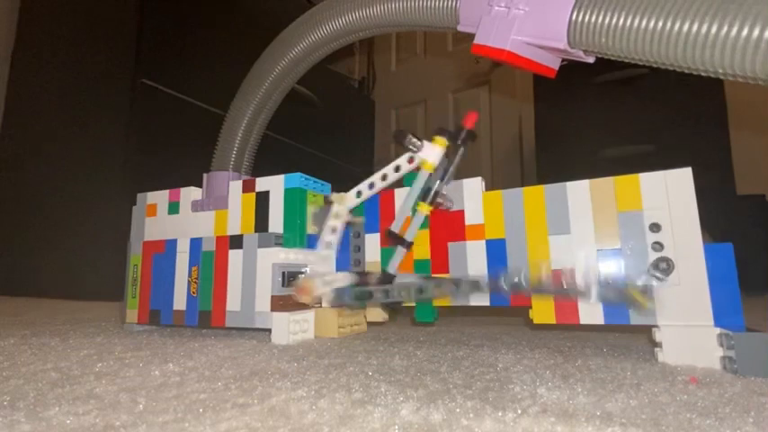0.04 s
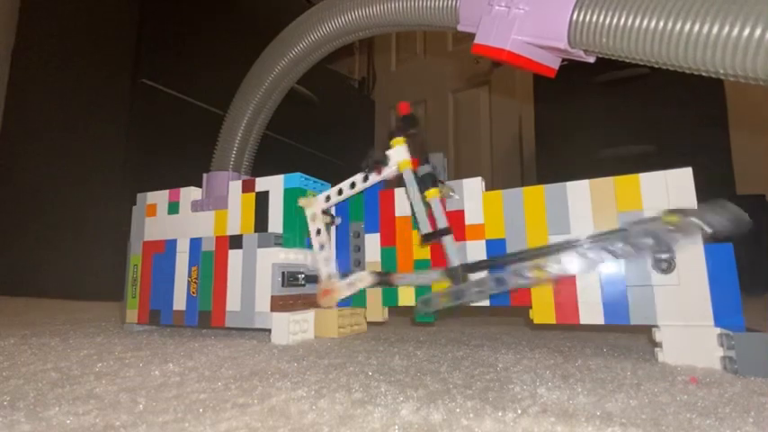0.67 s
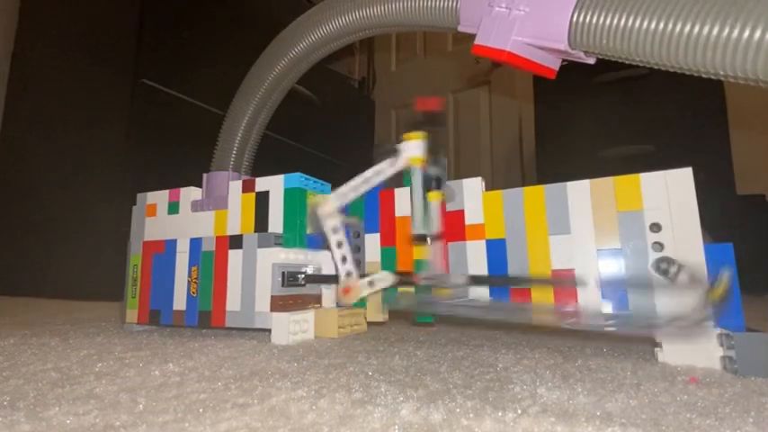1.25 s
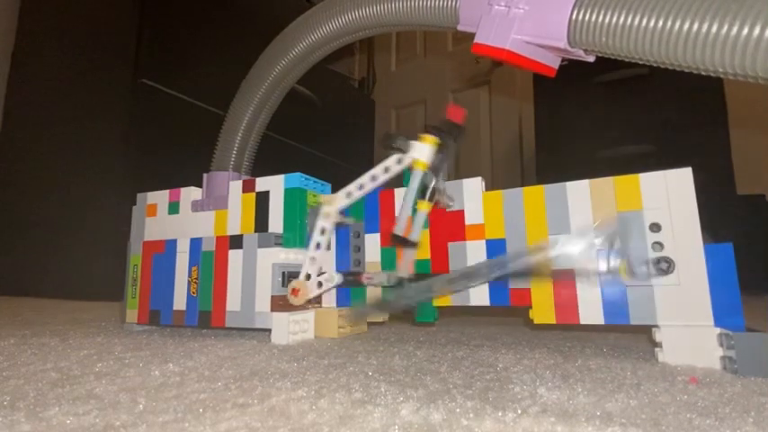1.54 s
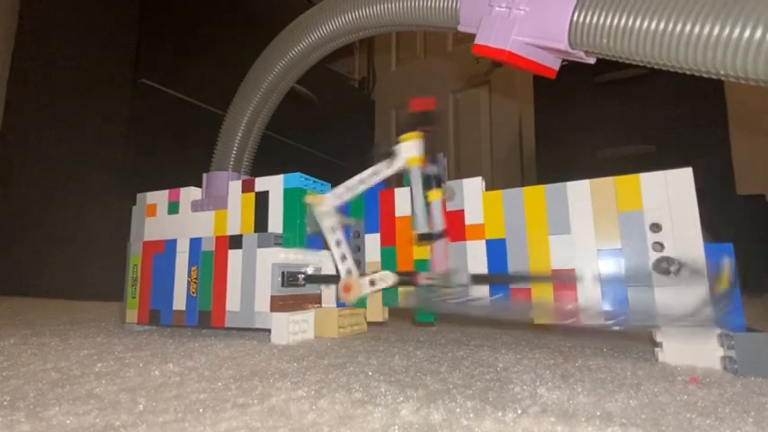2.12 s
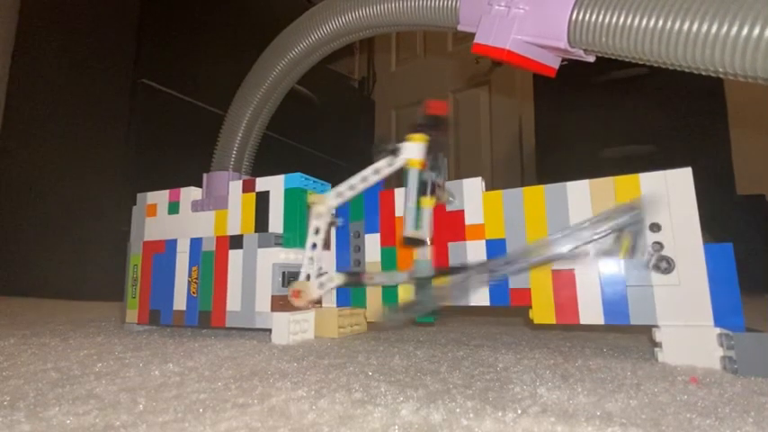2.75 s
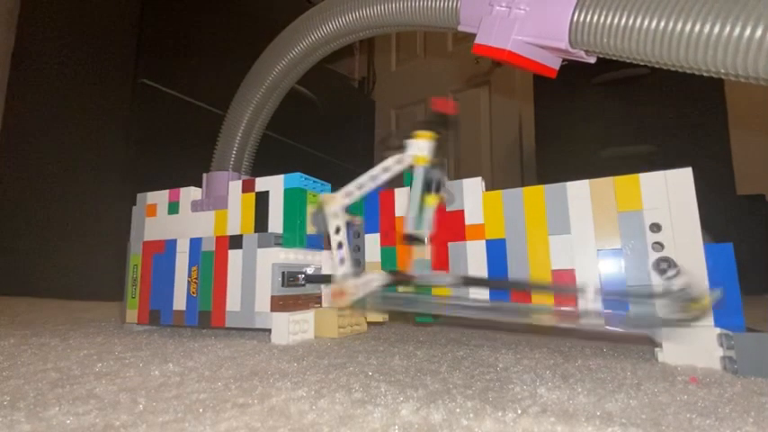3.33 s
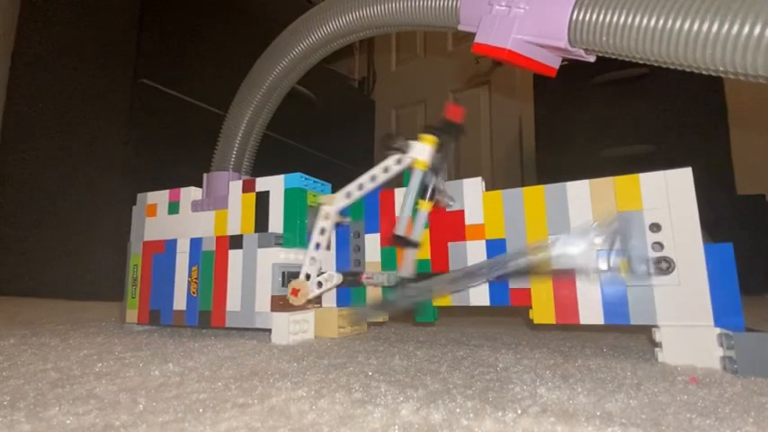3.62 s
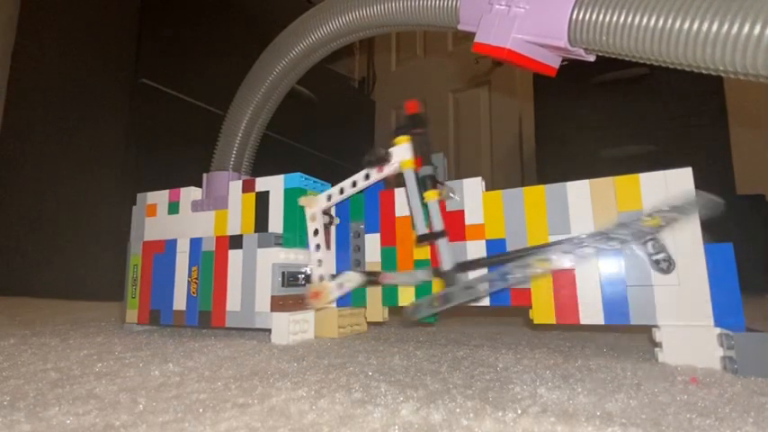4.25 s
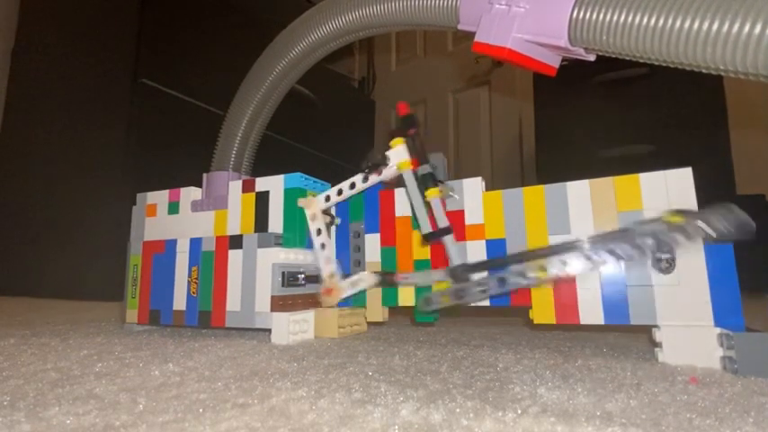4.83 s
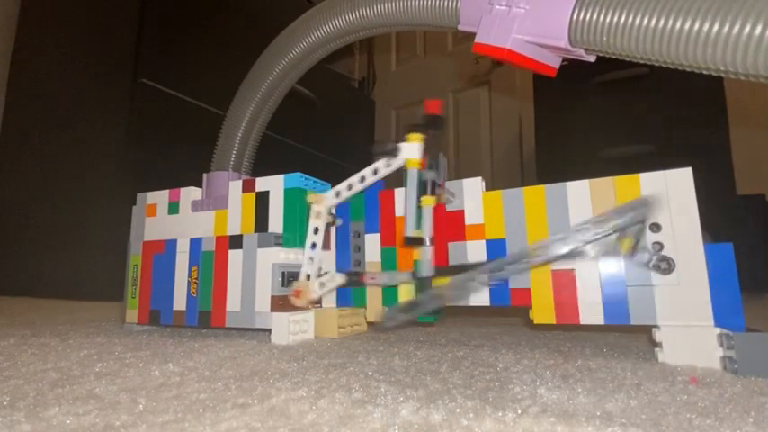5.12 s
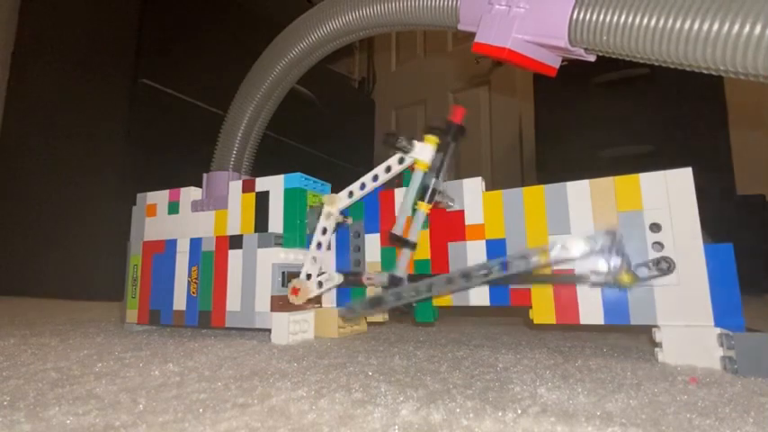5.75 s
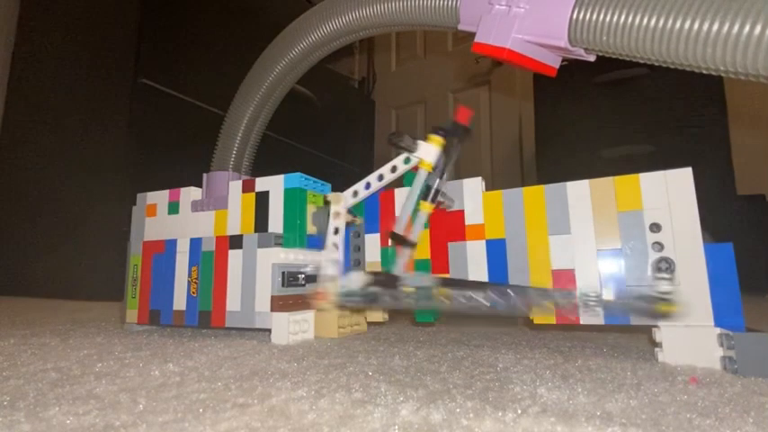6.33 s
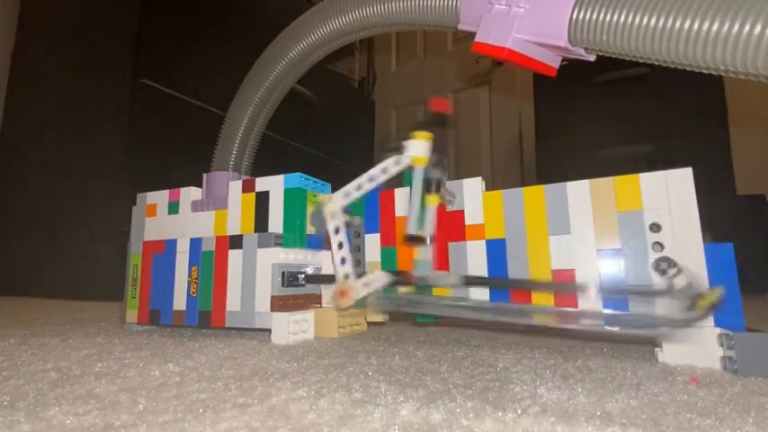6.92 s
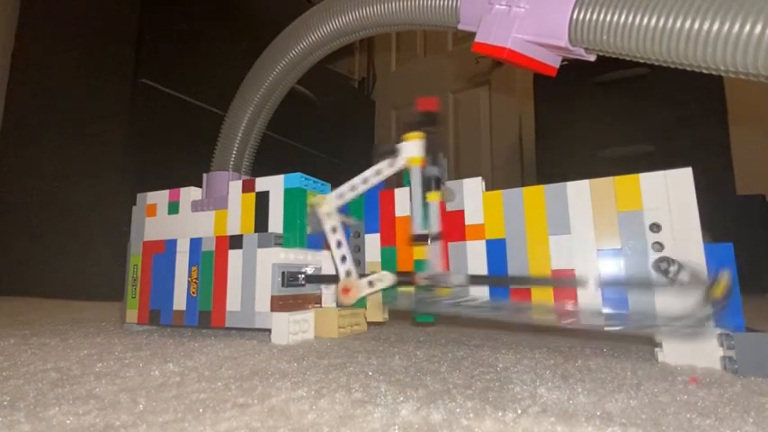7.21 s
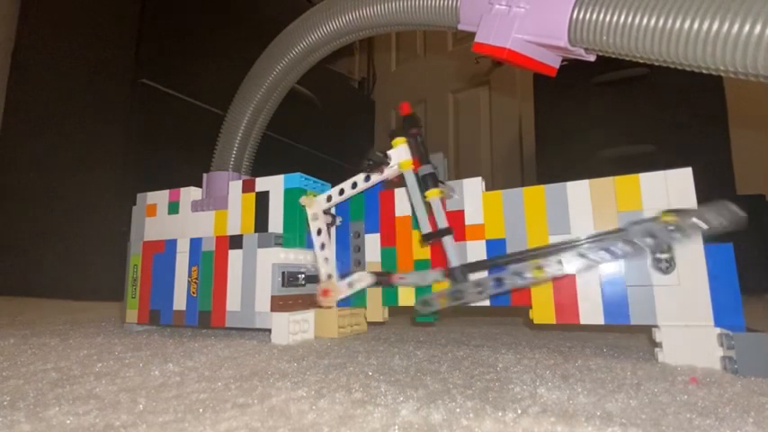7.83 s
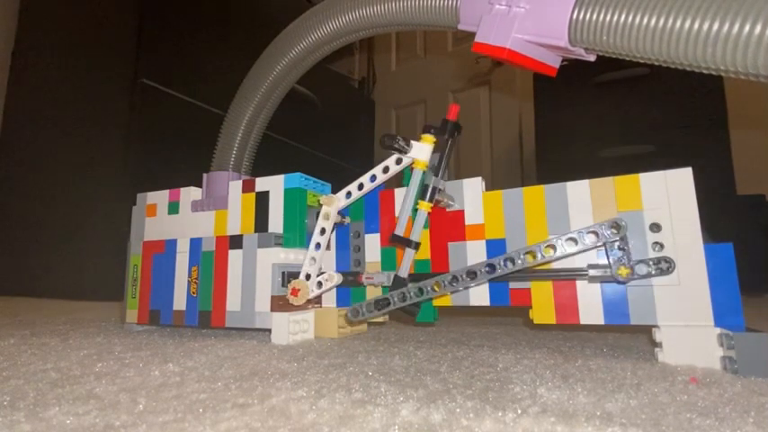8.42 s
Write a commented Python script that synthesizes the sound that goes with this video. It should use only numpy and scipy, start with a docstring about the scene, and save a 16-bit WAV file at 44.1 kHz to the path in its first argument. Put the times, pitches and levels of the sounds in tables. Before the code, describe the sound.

Indoors and near the microphone, a little piston engine made of plastic bricks clatters along with fast, irregular knocks and sharp ticks. Around it is the continuous roar of the vacuum cleaner that powers it, with a bright hiss, a steady hum and a high whine. The hiss softens about a third of the way through, then the hose moans faintly while the clacking carries on to the end.

```python
"""A vacuum cleaner drives a small piston engine built of plastic bricks, on a carpet indoors.
From the start, air roars through the hose and hisses in at the valve, the motor hums and whines, and the
hose sings faintly. The crank turns about eleven times a second: its pins click, and on many turns the
loose linkage clacks. At about 3 s the valve gap narrows and the hiss drops. From 4.4 s the hose also
moans softly, and at 6.6 s the gap eases open a little."""
import sys
import numpy as np
from scipy import signal
from scipy.fft import rfft, irfft
from scipy.io import wavfile
from scipy.ndimage import uniform_filter1d

SR = 44100
rng = np.random.default_rng(int(sys.argv[2]) if len(sys.argv) > 2 else 0)


def persist_wave(psi):
    """Save psi, clipped to +-1, as 16-bit WAV."""
    counts = np.round(np.clip(psi, -1, 1) * 32767).astype(np.int16)
    wavfile.write(sys.argv[1], SR, np.atleast_2d(counts).T)


N = 377937
T = np.arange(N) / SR


def gain_of(db):
    """Turns decibels into a factor to multiply a sound by."""
    return 10 ** (np.asarray(db) / 20)


def unit_power(x):
    """Scales a signal to an average power of 1."""
    return x / np.sqrt(np.mean(x ** 2) + 1e-20)


def follow(rows, points):
    """Looks up points in a table's first column, drawing straight lines between the rows."""
    known, *columns = np.transpose(rows)
    return [np.interp(points, known, c) for c in columns]


def at_pitch(rows, hz):
    """Looks up pitches in a table, on a scale where the octaves are about evenly spaced."""
    known_hz, *columns = np.transpose(rows)
    return [np.interp(np.log(hz + 1), np.log(known_hz + 1), c) for c in columns]


def wander(rate_hz):
    """A smooth random wobble of power 1 that changes up to about rate_hz times a second."""
    hz = np.fft.rfftfreq(N, 1 / SR)
    return unit_power(irfft(rfft(rng.standard_normal(N)) / (1 + (hz / rate_hz) ** 4), N))


def add(mix, start_s, sound):
    """Lays a stereo sound into the mix."""
    part = mix[:, max(round(start_s * SR), 0):][:, :sound.shape[1]]
    part += sound[:, :part.shape[1]]


def tone(hz, left_db, right_db, left_lead_rad, rough, width_hz):
    """A stereo tone; swirling air turns part of it (rough, 0 to 1) into noise close to its pitch."""
    rough = np.clip(rough, 0, 1)
    flutter = (wander(width_hz) + 1j * wander(width_hz)) / np.sqrt(2)
    wave = np.exp(2j * np.pi * np.cumsum(hz * np.ones(N)) / SR)
    wave *= np.sqrt(1 - rough ** 2) + rough * flutter
    left = gain_of(left_db) * (wave * np.exp(1j * left_lead_rad)).real
    return np.sqrt(2) * np.array([left, gain_of(right_db) * wave.real])


REOPEN_S = 6.6


def valve_gap(t, close_s=2.94, snap_s=0.095, creep_s=1, creep_share=0.35, settled=-0.11, reopen=0.11):
    """The valve's opening (1 wide, about 0 narrow): it holds, snaps narrow, creeps, then opens a bit."""
    since = np.maximum(t - close_s, 0)
    closing = (1 - creep_share) * np.exp(-since / snap_s) + creep_share * np.exp(-since / creep_s)
    return settled + (1 - settled) * closing + reopen * np.clip((t - REOPEN_S) / snap_s, 0, 1)


# Hiss at the valve, with the gap wide and with it narrow: pitch_hz, level_db_per_hz
WIDE_GAP_HISS = [(4000, -112), (4900, -63), (5300, -64), (6100, -59), (6900, -57.5), (7700, -60.5),
                 (8700, -59.5), (9600, -65.5), (10400, -68), (11500, -75.5), (12900, -72), (13700, -78)]
NARROW_GAP_HISS = [(4000, -83), (4900, -69), (5300, -70), (6100, -65.5), (6900, -67.5), (7700, -63),
                   (8700, -66), (9600, -66.5), (10400, -71.5), (11500, -76), (12900, -72.5), (13700, -79)]


def valve_hiss_db(t, hz, dim_s=4, dim_fade_s=0.8, dim_db=1.5, sputter_db=0.65):
    """How loudly air hisses through the gap at each time and pitch; the top sputters and dims a while."""
    gap = valve_gap(t)[:, None]
    level_db = gap * at_pitch(WIDE_GAP_HISS, hz)[0] + (1 - gap) * at_pitch(NARROW_GAP_HISS, hz)[0]
    dim = np.outer(np.clip((t - dim_s) / dim_fade_s, 0, 1) * (t < REOPEN_S), hz > 8900)
    sputter = np.outer(np.interp(t, T, wander(21)), hz > 9500)
    return level_db - dim_db * dim + sputter_db * sputter


# Air rushing through motor and hose: pitch_hz, wide_gap_db_per_hz, narrow_gap_db_per_hz
AIR_ROAR = [(30, -103, -103), (60, -70.5, -73), (75, -73, -71), (96.2, -77, -81), (135, -69, -70.5),
            (170, -72.5, -73.5), (233, -69.5, -70), (304, -67.5, -67), (335, -60, -64), (376, -62, -61.5),
            (410, -66.5, -68), (435, -66.5, -65), (460, -64, -67), (495, -66, -64), (574, -65.5, -70),
            (680, -61, -64.5), (824, -65, -64.5), (940, -67.5, -70.5), (1260, -73, -73.5),
            (1410, -72.5, -72), (1890, -71.5, -73.5), (2130, -73.5, -74), (2350, -72, -73),
            (2980, -72.5, -73), (3400, -70, -69.5), (4360, -71.5, -69)]
# Pitches at which the hose and casing ring: pitch_hz, width_hz, boost_db
HOSE_RESONANCES = [(377, 25, 1), (661, 49, 3), (1032, 98, 6), (1502, 47, 5.5), (2760, 78, 4.5)]


def suction_roar(t, hz, start_db=0.17, fade_db_per_s=0.04, flutter_db=1.18, top_hz=5200):
    """How strongly the rushing air roars at each time and pitch, coloured by the hose and casing."""
    gap = valve_gap(t)[:, None]
    wide_db, narrow_db = at_pitch(AIR_ROAR, hz)
    ring_db = sum(boost / (1 + (2 * (hz - pitch) / width) ** 2)
                  for pitch, width, boost in HOSE_RESONANCES)
    flow_db = start_db - fade_db_per_s * t + flutter_db * np.interp(t, T, wander(28))
    level_db = gap * wide_db + (1 - gap) * narrow_db + ring_db + flow_db[:, None]
    return gain_of(level_db) / np.sqrt(1 + (hz / top_hz) ** 12)


# How the air noise reaches left and right: pitch_hz, likeness_0_to_1, left_lead_rad, left_louder_db
AIR_STEREO = [(60, 0.44, 0.104, 3), (251, 0.91, 0.98, 2.5), (463, 0.63, 1.47, 1), (805, 0.83, 2.37, 3),
              (1270, 0.42, 1.85, 0.5), (1490, 0.17, 0.6, -2.5), (2030, 0, 0.76, -1.5),
              (3100, 0.24, 1.64, 1), (3990, 0.75, 3.2, -3.5), (5040, 0.2, 3.72, -5), (6360, 0.07, 5.2, -7),
              (7080, 0.1, 7.8, -11.5), (7710, 0.24, 11.5, -3.5), (8650, 0.4, 14.3, -12.5),
              (10080, 0.53, 17.5, 3), (11140, 1, 6 * np.pi, 0), (14000, 0.42, 6 * np.pi, 0)]


def rushing_air(swirl_db=1.0, frame=2048):
    """The suction: random noise, shaped one short frame at a time into the roar and the hiss."""
    hop = frame // 4
    t = np.arange(N // hop + 5) * hop / SR
    hz = np.fft.rfftfreq(frame, 1 / SR)
    noise = rng.standard_normal((5, len(t), len(hz)))
    hiss = gain_of(valve_hiss_db(t, hz)) * (hz > 3500)
    roar = suction_roar(t, hz)
    # swirls of air lift patches a few hundred hertz wide
    patches = uniform_filter1d(uniform_filter1d(noise[4], size=4, axis=0), size=16, axis=1)
    swirls = gain_of(swirl_db * unit_power(patches))
    likeness, lead, left_louder_db = at_pitch(AIR_STEREO, hz)
    likeness = np.clip(likeness, 0, 1)
    right = noise[0] + 1j * noise[1]
    left = likeness * right + np.sqrt(1 - likeness ** 2) * (noise[2] + 1j * noise[3])
    left *= np.exp(1j * lead) * gain_of(left_louder_db)
    stereo = np.array([left, right]) * np.sqrt(2 / (1 + gain_of(left_louder_db) ** 2))
    frames = stereo * np.hypot(hiss, roar) * swirls
    sound = signal.istft(frames.swapaxes(1, 2), nperseg=frame, noverlap=frame - hop)[1]
    per_hz_scale = np.sqrt(3 * SR / (8 * hop))
    return per_hz_scale * sound[:, :N]


# The room's effect on the whine, before lift_db: pitch_hz, left_db, right_db, left_lead_rad
WHINE_IN_ROOM = [(4520, -40, -40, 3.2), (4536, -54, -50, 3.3), (4550, -39, -38.2, 3.3),
                 (4571, -39, -34, 3.2), (4575, -37.7, -35, 3.3), (4580, -41, -38.7, 2.7),
                 (4591, -43.3, -35.6, 3.1), (4599, -47.5, -33.7, 2.6), (4604, -58, -33.2, 2.8),
                 (4607, -50, -36.3, 4.9), (4611.5, -43, -41.3, 4.3), (4615, -41, -37.3, 3.8),
                 (4625, -41.7, -37.3, 3.4)]


def blade_whine(hz, lift_db=1.0):
    """Fan blades whine; the room's loud and quiet spots move with the pitch. A wide gap adds flicker."""
    left_db, right_db, lead = follow(WHINE_IN_ROOM, hz)
    rough = 0.1 + 0.08 * valve_gap(T)
    return tone(hz, left_db + lift_db, right_db + lift_db, lead, rough, width_hz=15)


# Speed of the vacuum motor: time_s, turns_per_s
MOTOR_SPEED = [(0.66, 505.6), (0.92, 502.2), (1.2, 504), (1.55, 507.9), (2.5, 508.2), (3.7, 508.8),
               (4.3, 510.2), (5.5, 511.5), (6.2, 512.6), (8.3, 513.8)]


def vacuum_motor(blades=9):
    """The off-balance shaft hums; the blades whine at the rate they pass, and an octave higher."""
    shaft_hz = follow(MOTOR_SPEED, T)[0] * (1 + 0.00015 * wander(13.0))
    # echoes in the room shift the left side against the right as the pitch creeps up
    lead = 2.09 + 0.077 * (shaft_hz - shaft_hz.mean())
    hum = tone(shaft_hz, left_db=-33.5, right_db=-31.5, left_lead_rad=lead, rough=0.12, width_hz=7.4)
    blade_hz = blades * shaft_hz
    octave = tone(2 * blade_hz, left_db=-45, right_db=-55, left_lead_rad=2.2, rough=0.65, width_hz=25)
    return hum + blade_whine(blade_hz) + octave


# Tones of a slower motor, before they swell: multiple_of_speed, left_db, right_db, left_lead_rad
SLOW_MOTOR_TONES = [(1, -52.8, -56, .6), (2, -51.5, -58, 1.3), (4, -39, -43.2, 2.2), (6, -48.5, -52, 2.1),
                    (7, -52.5, -53.5, 2.2)]


def room_hum(mains_hz=120, motor_hz=101, rise_hz_per_s=0.07, swell_mid_s=5.5, swell_length_s=1.1):
    """Mains electricity hums, along with a slower motor that wavers and later swells a little."""
    speed_hz = (motor_hz + rise_hz_per_s * T) * (1 + 0.00053 * wander(2.5))
    mains = tone(mains_hz, left_db=-49, right_db=-46, left_lead_rad=0.9, rough=0.18, width_hz=6.6)
    swell_db = 0.9 * np.clip((T - swell_mid_s) / swell_length_s + 0.5, 0, 1)
    motor = sum(tone(multiple * speed_hz, left + swell_db, right + swell_db, lead, 0.13, width_hz=2.7)
                for multiple, left, right, lead in SLOW_MOTOR_TONES)
    return mains + motor


def hose_song(start_hz=290.5, fall_hz_per_s=4.4, dip_hz=8, dip_s=1.05, dip_half_s=0.5):
    """Air over the ribs of the hose sings softly, dipping once, and sinks and fades with the flow."""
    dip = np.exp(-((T - dip_s) / dip_half_s) ** 2)
    hz = start_hz - fall_hz_per_s * T - dip_hz * dip
    level_db = -41.5 - 1.3 * T
    return tone(hz, level_db, level_db - 2.7, left_lead_rad=1.5, rough=0.15, width_hz=4)


def crack(t, low_hz, high_hz, fade_s):
    """A dry crack: a puff of noise that dies at once, different on the left and the right."""
    band = signal.butter(2, [low_hz, high_hz], "bandpass", fs=SR, output="sos")
    return unit_power(signal.sosfilt(band, rng.standard_normal((2, len(t))))) * np.exp(-t / fade_s)


# How the plastic beams ring: pitch_hz, relative_level_db, ring_s (time to fade by 60 dB)
BEAM_RINGS = [(1880, -7, 0.025), (1990, -8, 0.018), (2355, -2, 0.026), (2490, -11, 0.029),
              (2630, -10, 0.016), (3580, -8, 0.0097), (4920, -5, 0.012), (10430, 2, 0.0099)]


def knock(level_db, pitch_spread=0.016, crack_db=-10, rattle_db=-8, rattle_s=0.009, bounces=3):
    """A loose joint closes with a crack that rings the beams; a few lighter bounces follow."""
    t = np.arange(SR // 16) / SR
    hz, ring_db, ring_s = np.transpose(BEAM_RINGS)[:, :, None]
    hz = hz * (1 + pitch_spread * rng.standard_normal(hz.shape))
    shift_cycles = 0.34 * rng.random((2, len(hz), 1))  # the beams send sound unevenly to each side
    rings = gain_of(ring_db - 60 * t / ring_s) * np.sin(2 * np.pi * (hz * t + shift_cycles))
    hit = rings.sum(1) * (1 - np.exp(-t / 0.0011))
    hit += gain_of(crack_db) * crack(t, low_hz=1300, high_hz=4200, fade_s=0.0012)
    contacts = np.zeros(len(t))
    contacts[0] = 1
    bounce_at = (rattle_s * SR * rng.uniform(0.25, 1, bounces)).astype(int)
    contacts[bounce_at] = gain_of(rattle_db) * rng.uniform(0.9, 1, bounces)
    sound = signal.fftconvolve(hit, contacts[None], axes=1)
    peak = np.sqrt(uniform_filter1d((sound ** 2).mean(0), size=128, mode="constant").max())
    return gain_of(level_db) * sound / peak


# The loudest knocks of the linkage: start_s, level_db (before trim_db)
LINKAGE_KNOCKS = [(0.069, -29), (0.085, -26.5), (0.148, -35), (0.241, -23.5), (0.389, -32), (0.418, -29.5),
                  (0.503, -30), (0.6224, -29.5), (1.043, -31.5), (1.415, -29.5), (1.505, -32), (1.597, -29),
                  (1.6871, -30.5), (1.78, -25.5), (1.867, -34), (1.98, -35), (2.2984, -26), (2.315, -27),
                  (2.38, -37), (2.48, -29), (2.555, -27), (2.6434, -26.5), (2.818, -28.5), (2.9015, -32),
                  (2.997, -27), (3.074, -23.5), (3.1682, -25.5), (3.2545, -30.5), (3.353, -28),
                  (3.427, -32), (3.519, -27.5), (3.607, -32), (3.7035, -29), (3.797, -29), (4.1165, -30),
                  (4.187, -33), (4.344, -32), (4.422, -33), (4.551, -34), (4.774, -26.5), (5.014, -32),
                  (5.1137, -29.5), (5.263, -32), (5.819, -31.5), (6.0874, -31), (6.2056, -29.5),
                  (6.3602, -29), (6.378, -32), (6.618, -32), (6.7416, -28.5), (7.026, -33), (7.31, -30.5),
                  (7.473, -32), (7.597, -35), (7.76, -32.5)]


def linkage(trim_db=-3.5):
    """The joints knock as the crank turns over, on some turns hard enough to stand out of the roar."""
    out = np.zeros((2, N))
    for start_s, level_db in LINKAGE_KNOCKS:
        add(out, start_s, knock(level_db + trim_db))
    return out


def crank_turns(turn_s):
    """When each turn of the crank starts: a whole number of turns lies between two loud knocks."""
    marks_s = np.r_[np.transpose(LINKAGE_KNOCKS)[0], N / SR]
    turns_between = np.maximum(np.round(np.diff(marks_s) / turn_s), 1)
    turns_so_far = np.r_[0, np.cumsum(turns_between)]
    return np.interp(np.arange(turns_so_far[-1]), turns_so_far, marks_s)


# Sharp ticks of a pin snapping against the edge of its hole: start_s, level_db (before trim_db)
PIN_TICKS = [(0.423, -27), (1.457, -28), (1.6525, -27.5), (2.092, -26), (2.3593, -28), (2.7045, -28),
             (2.727, -24.5), (2.902, -26), (3.0742, -26), (3.606, -24), (6.8795, -29)]


def pin_clicks(turn_s=0.091, trim_db=-3, uneven_db=2.5):
    """Pins click in their holes: a few sharp ticks, and a faint one somewhere in each turn."""
    out = np.zeros((2, N))
    t = np.arange(SR // 50) / SR
    turns = crank_turns(turn_s)
    faint_s = turns + turn_s * rng.random(len(turns))
    faint_db = -37 + uneven_db * rng.standard_normal(len(turns))
    for start_s, level_db in [*PIN_TICKS, *zip(faint_s, faint_db)]:
        click = crack(t, low_hz=8500, high_hz=14500, fade_s=0.0025)
        add(out, start_s, gain_of(level_db + trim_db) * click)
    return out


def hose_moan(start_s=4.4, swell_s=0.46, low_hz=368, top_hz=386, glide_s=1.6, level_db=-43.5):
    """Once the flow has slackened, a second note of the hose swells, throbs and creeps up in pitch."""
    hz = low_hz + (top_hz - low_hz) * np.clip((T - start_s) / glide_s, 0, 1)
    swell = np.clip((T - start_s) / swell_s, 0, 1)
    return swell * tone(hz, level_db, level_db - 7, left_lead_rad=1.5, rough=0.85, width_hz=10)


def scene():
    """The vacuum cleaner and the little engine together."""
    return (rushing_air() + vacuum_motor() + room_hum() + hose_song() + hose_moan()
            + linkage() + pin_clicks())


def record(dry):
    """Cuts the deep bass below 45 Hz and the high treble above 14100 Hz."""
    bass_cut = signal.butter(4, 45, "highpass", fs=SR, output="sos")
    treble_cut = signal.firwin(501, 14100, window=("kaiser", 9), fs=SR)
    return signal.oaconvolve(signal.sosfilt(bass_cut, dry), treble_cut[None], "same")


dry = scene()
out = record(dry)
persist_wave(out)
```